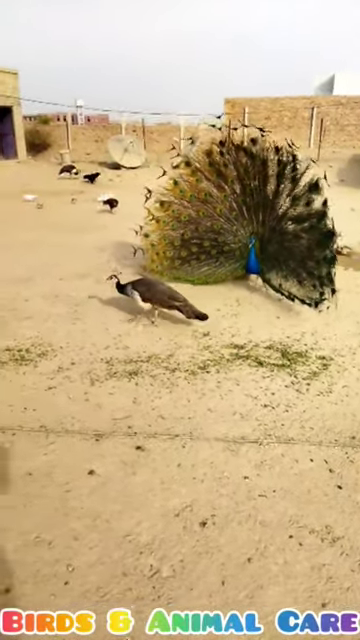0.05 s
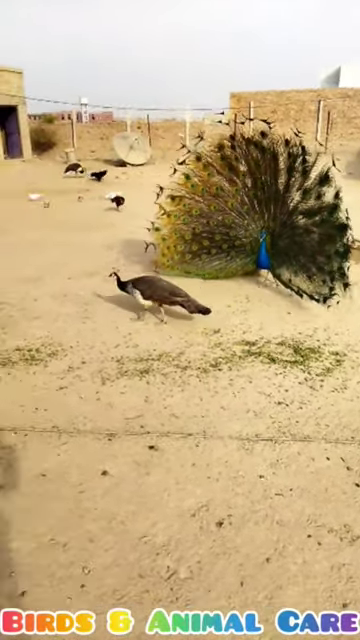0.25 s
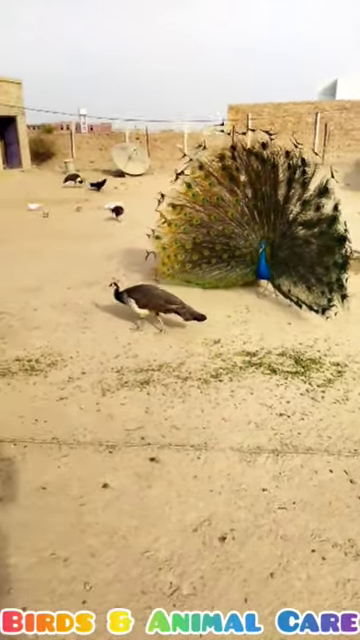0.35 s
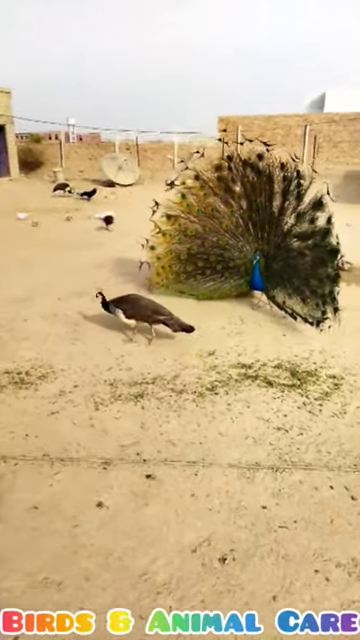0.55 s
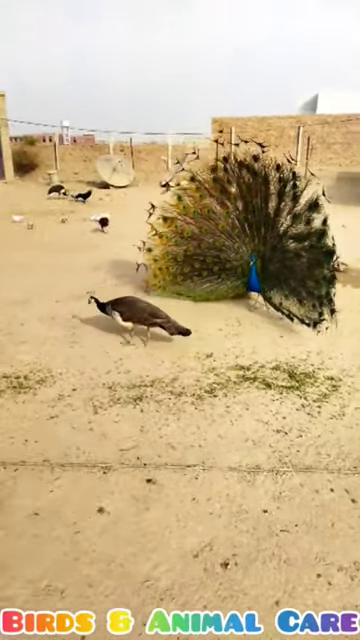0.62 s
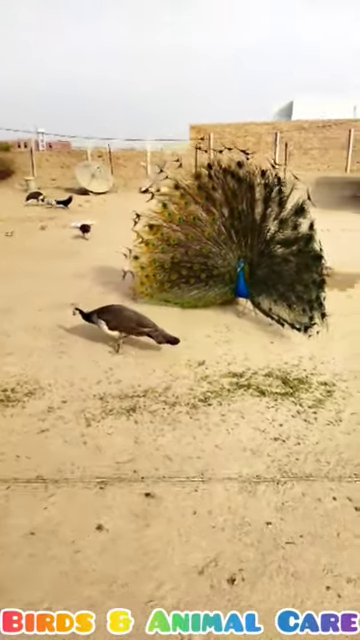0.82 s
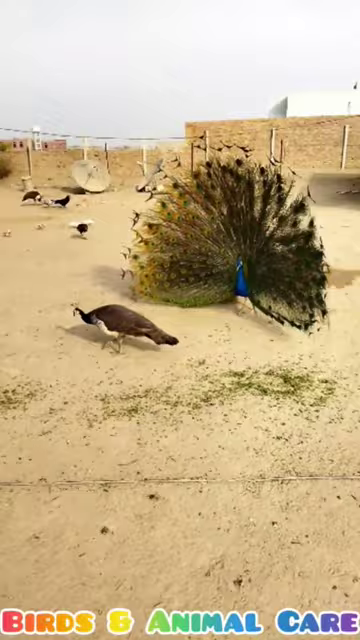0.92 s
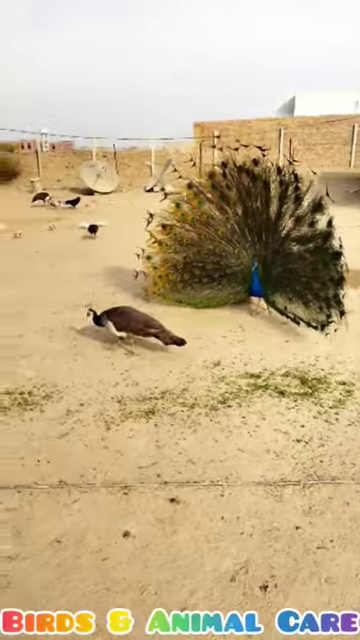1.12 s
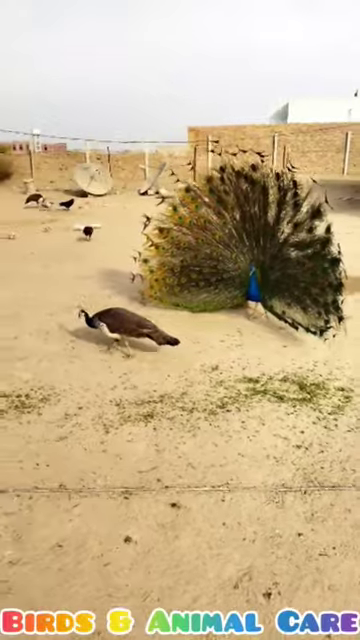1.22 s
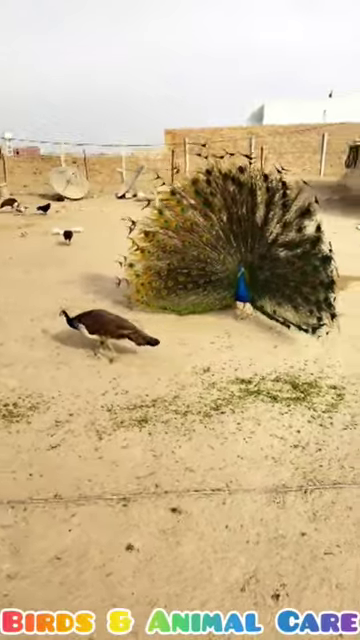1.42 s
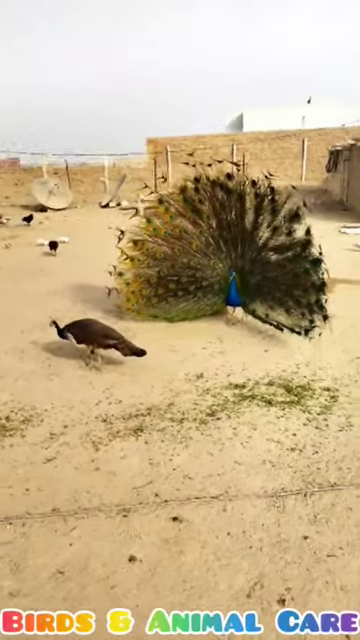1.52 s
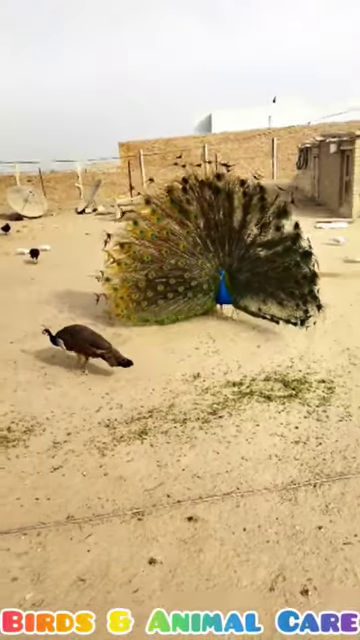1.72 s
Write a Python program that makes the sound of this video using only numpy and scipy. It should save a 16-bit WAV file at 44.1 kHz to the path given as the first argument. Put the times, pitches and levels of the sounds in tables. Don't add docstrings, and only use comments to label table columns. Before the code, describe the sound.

A peafowl gives two loud, harsh nasal calls in a walled yard among small bird chirps

```python
import sys
import numpy as np
from scipy import signal
from scipy.fft import rfft, irfft
from scipy.io import wavfile
from scipy.ndimage import uniform_filter1d

SR = 44100
rng = np.random.default_rng(int(sys.argv[2]) if len(sys.argv) > 2 else 0)


def waveform_to_disk(signal):
    frames = np.transpose(np.atleast_2d(signal))
    scaled = np.clip(frames, -1, 1) * 32767
    samples = np.round(scaled).astype(np.int16)
    wavfile.write(sys.argv[1], SR, samples)


def linear_from_db(decibels):
    return 10 ** (np.asarray(decibels, float) / 20)


N = 77175

# (time [s], pitch [Hz], level [dB], beak-opening tilt [dB/octave], left minus right [dB])
FIRST_CALL = [(0.223, 300, -62, 5, 0), (0.243, 386.7, -38, 8, 0), (.26, 479.3, -35, 3.5, 0),
              (.289, 587, -32, -3, -3), (0.313, 599.4, -31.5, 0.5, -3.5), (0.428, 607, -32.5, -3.5, -4),
              (0.519, 549.2, -32.5, -1, -6.5), (0.587, 511.3, -34.5, 4, 2.5), (0.627, 369.6, -46, 23, -3)]
SECOND_CALL = [(0.948, 301.3, -50.5, -18, -9), (0.976, 382.7, -38, -9, 0), (1.008, 545.5, -33, 3, -3.5),
               (1.054, 619, -31.5, -4.5, 5.5), (1.111, 646, -29, -3.5, 9), (1.192, 630.8, -38, 6.5, 3),
               (1.224, 638, -31.5, 2.5, 1.5), (1.315, 537.2, -34.5, 1.2, -6.5), (1.355, 351.3, -45, -8, -3)]
# (throat shift [ratio], overtone leading the swoop [number], top overtones [dB])
CALL_VOICES = [
    (0.942, 4, -3),
    (0.969, 5, -7.5),
]
# (centre [Hz], width [Hz], level [dB])
THROAT_RESONANCES = [(1123, 640, -9.5), (1982, 554, 5.5), (2538, 572, 0), (3777, 350, -15.5),
                     (4778, 626, -8), (6310, 1150, -17), (8840, 1760, -29.5), (12100, 1000, -34)]
# (frequency [Hz], left lead [rad])
FIRST_TURN = [(1150, 0.01), (1550, -1.1), (1800, 2.05), (2100, -.8), (2400, 1.3), (3000, 2.1), (4500, 1.6)]
SECOND_TURN = [(1280, 4), (1650, 1.3), (1930, 2.43), (2250, 0.94), (2580, 1.04), (3200, 1.73), (4500, 0.87)]
# (arch top [s], peak [Hz], level [dB], tick level [dB], left minus right [dB])
SPARROW_CHIRPS = [
    (0.687, 4420, -37.5, -49.5, 0),
    (1.391, 4483, -39, -53, 0.5),
    (1.603, 4422, -45, -51, -1),
]
# (centre [s], level [dB], pitch [Hz], length [s])
HEN_CLUCKS = [(.74, -58.5, 489.7, 0.02), (.741, -54.5, 250, 0.0095), (0.823, -48.5, 335.5, 0.0095),
              (0.863, -63, 334, 0.019), (0.918, -50.5, 330, 0.022), (1.314, -57, 472.4, 0.019),
              (1.361, -53.5, 677, 0.0072), (1.607, -58, 655, 0.0083), (1.62, -61, 820, 0.029),
              (1.639, -59, 760, 0.0089)]
# (time [s], pitch [Hz], level [dB])
HEN_CROON = [(1.078, 288, -57), (1.103, 262, -67), (1.115, 258.6, -59.5), (1.274, 308, -60),
             (1.295, 290, -58.5), (1.331, 292, -74)]
# (start [s], length [s], from [Hz],
# to [Hz], level [dB])
FAR_WHISTLES = [(.001, .042, 3750, 4006, -57.5), (0.033, 0.028, 4000, 4560, -54.5),
                (.053, 0.03, 4450, 3960, -58), (0.058, 0.045, 4850, 4600, -54),
                (0.093, 0.034, 4700, 3850, -52), (0.058, 0.03, 3400, 2850, -63),
                (0.125, .022, 3150, 3860, -58), (.145, 0.014, 4080, 3800, -49),
                (0.165, 0.022, 3300, 3200, -55), (0.176, 0.055, 3750, 4000, -57),
                (0.225, 0.016, 6050, 6200, -57), (0.737, 0.049, 5150, 5950, -64.5),
                (0.799, 0.051, 5950, 5030, -63), (0.732, 0.04, 7000, 7900, -66),
                (0.744, 0.03, 8350, 8900, -66), (1.008, 0.035, 4000, 3700, -53),
                (.987, .016, 3850, 4000, -53), (.974, .016, 4300, 4450, -55),
                (1.18, 0.015, 4700, 5400, -54), (1.19, 0.031, 3650, 4050, -53),
                (1.216, 0.043, 4050, 3576, -54), (1.245, 0.029, 3550, 3800, -54),
                (1.397, 0.02, 3000, 3300, -64), (0.207, 0.047, 3650, 3300, -63),
                (.01, .11, 2436, 2265, -68.5), (1.712, 0.046, 5100, 6200, -66),
                (.645, .018, 3750, 4000, -54), (1.567, .014, 3600, 4050, -58),
                (1.355, .014, 3750, 3850, -57), (1.51, .025, 5300, 5350, -69)]
# (delay [s], level [dB], left minus right [dB], left lag [ms])
SLAP_ECHOES = [
    (.0031, -15, -4.5, 0.34),
    (.0085, -15, 10, -0.2),
    (.046, -17, -12, 0.073),
    (.072, -17, 8, 0.29),
]
# (delay [s], spread [s], level [dB])
FAR_WALL_SMEARS = [
    (0.091, 0.029, -18),
    (0.259, 0.058, -31.5),
]
# (frequency [Hz], density [dB/Hz])
AIR_COLOUR = [(41, -17), (70, -0.5), (222, -6), (333, -9.5), (1380, -17.5), (2120, -16.5), (3990, -21.5),
              (5730, -27.5), (15500, -36.5)]
# (frequency [Hz], correlation [-1..1])
AIR_LIKENESS = [(60, 0.98), (300, 0.78), (700, 0.7), (1400, 0.047), (3000, -0.1), (8000, -0.071)]
# (time [s], level [dB])
FLOCK_STIR = [(0, 6), (.2, 0.5), (.26, 16), (.7, 8.5), (.84, 3), (.9, -1), (.96, 0.5), (1, 8.5), (1.4, 7.5),
              (1.45, -4), (1.52, -1.5), (1.56, 4.5), (1.66, 0), (1.75, -0.5)]

JITTER_RATIO, SHIMMER_DB, SHIMMER_RISE_DB, BLUR_RAD = .001, 1.2, .45, .018
BREATH_DB, BREATH_TILT_DB_PER_OCT, BREATH_AT_ENDS_DB, ENDS_DULL_DB = -30, 8, 17, 5
SWOOP_FOCUS_DB, SWOOP_S, TOP_FROM_HZ, THROAT_CUT_HZ = 14, .05, 3500, 1000
ARCH_UP_S, ARCH_DOWN_S, ARCH_DROP_RATIO, ARCH_OCTAVE_DB, WARBLE_RATIO = .034, .04, .16, -26, .01003
TICK_LEAD_S, TICK_S, TICK_FROM_RATIO, TICK_TO_RATIO = .069, .0228, .975, 1.07
UPPER_RATIO, UPPER_LAG_S, UPPER_DB = 1.025, .003, -2.5
UPPER_UP_S, UPPER_DOWN_S, UPPER_DROP_RATIO = .024, .032, .055
FLUTTER_DB, WAVER_RATIO, CROON_OCTAVE_DB = 2.5, .01, -5.5
YARD_T60_S, YARD_DB, YARD_CUT_HZ, FAR_WET_DB = .28, -16, 7000, 2
AIR_DB, AIR_PATCHY_DB, STIR_FROM_HZ, MIC_CUT_HZ = -54.5, 1.5, 2760, 71


def in_time(rows):
    time_s, *columns = np.transpose(rows)
    return [np.interp(np.arange(N) / SR, time_s, column) for column in columns]


def at_hz(points, hz):
    point_hz, value = np.array(points)[:, :2].T
    return np.interp(np.log(hz), np.log(point_hz), value)


def smooth(x, width_s):
    return uniform_filter1d(x, int(width_s * SR) + 1)


def drift(rate_hz):
    pole = np.exp(-2 * np.pi * rate_hz / SR)
    white = rng.standard_normal(N + SR // 4)
    slow = signal.lfilter([1], [1, -2 * pole, pole * pole], white)[SR // 4:]
    return (slow - slow.mean()) / slow.std()


def place(x, pan_db, lag_ms, delay_s=0):
    hz = np.fft.rfftfreq(2 * N, 1 / SR)
    lag_s = delay_s + np.array([[lag_ms], [-lag_ms]]) / 2000
    both = irfft(rfft(x, 2 * N) * np.exp(-2j * np.pi * hz * lag_s))[:, :N]
    return both * linear_from_db(np.array([[pan_db], [-pan_db]]) / 2)


def peafowl(rows, shift, lead, top_db):
    hz, db, tilt, _ = in_time(rows)
    t = np.arange(N) / SR
    start_s, end_s = rows[0][0], rows[-1][0]
    swoop = np.clip(2 - 2 * (t - start_s) / SWOOP_S * 0.89, 0, 1)
    ends = 1 - hz / hz.max()
    hz = smooth(hz, 0.0084) * (1 + JITTER_RATIO * (1 + 8 * ends) * drift(71))
    phase = 2 * np.pi * np.cumsum(hz) / SR

    tone, power = 0, 0
    for k in range(1, 20):
        shimmer_db = (SHIMMER_DB + SHIMMER_RISE_DB * np.clip(k - 3, 0, 7)) * drift(23)
        beak_db = tilt * np.clip(np.log2(k * hz / 2000), -.6, .6)
        dull_db = ENDS_DULL_DB * ends * np.maximum(k - 5, 0)
        high_db = top_db * (k * hz > TOP_FROM_HZ)
        focus_db = SWOOP_FOCUS_DB * swoop * (k != lead) * (k != 2)
        gain = throat(k * hz / shift) * linear_from_db(shimmer_db + beak_db - dull_db + high_db - focus_db)
        tone = tone + gain * np.sin(k * phase + k * k * 0.27 + BLUR_RAD * k * drift(81))
        power = power + gain ** 2 / 2
    tone = tone / smooth(np.sqrt(power), 0.065)

    f = np.fft.rfftfreq(N, 1 / SR) + 1
    colour = throat(f / shift) * linear_from_db(BREATH_TILT_DB_PER_OCT * np.log2(f))
    puffs = rng.standard_normal(N) * (1 + np.cos(phase))
    breath = irfft(rfft(puffs) * colour, N)
    breath_db = BREATH_DB + 2 * BREATH_AT_ENDS_DB * np.minimum(ends, .3)
    edge = np.clip(np.minimum(t - start_s, end_s - t) / 0.017, 0, 1)
    return edge * linear_from_db(smooth(db, 0.0051)) * (tone + linear_from_db(breath_db) * breath / breath.std())


def throat(hz):
    power = sum(linear_from_db(2 * db) / (1 + (2 * (hz - f) / w) ** 2) ** 2 for f, w, db in THROAT_RESONANCES)
    return np.sqrt(power / (1 + (THROAT_CUT_HZ / hz) ** 6))


def heard(x, rows, turn):
    half = at_hz(turn, np.fft.rfftfreq(N, 1 / SR) + 1) / 2
    pan_db = smooth(in_time(rows)[3], 0.012)
    return irfft(rfft(x) * np.exp(1j * half * [[1], [-1]]), N) * linear_from_db(pan_db * [[1], [-1]] / 2)


def sparrow():
    out = 0
    for s, hz, db, tick_db, pan_db in SPARROW_CHIRPS:
        lower = arch(s, hz, db, ARCH_UP_S, ARCH_DOWN_S, ARCH_DROP_RATIO)
        upper = arch(s + UPPER_LAG_S, hz * UPPER_RATIO, db + UPPER_DB,
                     UPPER_UP_S, UPPER_DOWN_S, UPPER_DROP_RATIO)
        tick = note(s - TICK_LEAD_S, TICK_S, hz * TICK_FROM_RATIO, hz * TICK_TO_RATIO, tick_db)
        out = out + place(lower + upper + tick, pan_db, -0.058)
    return out


def arch(top_s, hz, db, up_s, down_s, drop):
    t = np.arange(N) / SR - top_s
    u = np.clip(np.where(t < 0, t / up_s, t / down_s), -1, 1)
    bend = 1 - drop * np.sin(np.pi * u / 2) ** 2 + WARBLE_RATIO * drift(209)
    phase = 2 * np.pi * np.cumsum(hz * bend) / SR
    wave = np.sin(phase) + linear_from_db(ARCH_OCTAVE_DB) * np.sin(2 * phase)
    return linear_from_db(db + 2 * drift(100)) * (1 - u ** 2) ** 0.93 * wave


def note(start_s, length_s, from_hz, to_hz, db, octave_db=-30):
    u = np.clip((np.arange(N) / SR - start_s) / length_s, 0, 1)
    glide_hz = from_hz + (to_hz - from_hz) * (1 - np.cos(np.pi * u)) / 2
    phase = 2 * np.pi * np.cumsum(glide_hz * (1 + WAVER_RATIO * drift(117))) / SR
    soft = np.sqrt(np.sin(np.pi * u) + 1e-12) * (u > 0) * (u < 1)
    wave = np.sin(phase) + linear_from_db(octave_db) * np.sin(2 * phase)
    return linear_from_db(db + 4.5 + FLUTTER_DB * drift(120)) * soft * wave


def hen():
    hz, db = in_time(HEN_CROON)
    t = np.arange(N) / SR
    phase = 2 * np.pi * np.cumsum(hz * (1 + 0.027 * drift(20))) / SR
    edge = np.clip(np.minimum(t - HEN_CROON[0][0], HEN_CROON[-1][0] - t) / 0.014, 0, 1)
    octave = linear_from_db(CROON_OCTAVE_DB + 2.6 * drift(18)) * np.sin(2 * phase)
    croon = edge * linear_from_db(db + 5.5) * (np.sin(phase) + octave)
    clucks = sum(note(s - d / 2, d, f * 1.05, f * 0.967, level) for s, level, f, d in HEN_CLUCKS)
    return place(croon + clucks, -0.35, -0.14)


def far_birds():
    return place(sum(note(*row) for row in FAR_WHISTLES), 1.0, -0.061)


def yard(x):
    mono = x.mean(0)
    slaps = sum(linear_from_db(db) * place(mono, pan_db, lag_ms, s) for s, db, pan_db, lag_ms in SLAP_ECHOES)
    t = np.arange(SR // 2) / SR
    onset = np.clip((t - .01) / 0.0093, 0, 1)
    tail = rng.standard_normal((2, len(t))) * linear_from_db(-60 * t / YARD_T60_S) * onset
    tail = linear_from_db(YARD_DB) * tail / np.sqrt((tail ** 2).sum(1, keepdims=True))
    for s, spread_s, db in FAR_WALL_SMEARS:
        shape = np.exp(-((t - s) / spread_s) ** 2)
        tail = tail + linear_from_db(db) * rng.standard_normal((2, len(t))) * shape / np.linalg.norm(shape)
    wet = slaps + signal.fftconvolve(mono[None], tail, axes=1)[:, :N]
    return signal.sosfilt(signal.butter(1, YARD_CUT_HZ, fs=SR, output="sos"), wet)


def air():
    out, edges_hz = 0, 28 * 2 ** np.arange(0, 9.4, .5)
    stir_db = smooth(in_time(FLOCK_STIR)[0], 0.021)
    white = rng.standard_normal((2, 2, N + SR))
    for k, (low, high) in enumerate(zip(edges_hz, edges_hz[1:])):
        band = signal.butter(2, [low, high], "band", fs=SR, output="sos")
        mid, side = signal.sosfilt(band, white[k % 2])[:, SR:]
        hz = np.sqrt(low * high)
        alike = np.clip(at_hz(AIR_LIKENESS, hz), -1, 1)
        band_stir_db = stir_db / (1 + (STIR_FROM_HZ / hz) ** 2)
        gain = linear_from_db(at_hz(AIR_COLOUR, hz) + AIR_PATCHY_DB * drift(36) + band_stir_db)
        out = out + gain * (np.sqrt(1 + alike) * mid + np.sqrt(1 - alike) * side * [[1], [-1]])
    return linear_from_db(AIR_DB) * out / out.std()


def scene():
    first = peafowl(FIRST_CALL, *CALL_VOICES[0])
    second = peafowl(SECOND_CALL, *CALL_VOICES[1])
    calls = heard(first, FIRST_CALL, FIRST_TURN) + heard(second, SECOND_CALL, SECOND_TURN)
    chirps = sparrow()
    far = far_birds()
    to_walls = linear_from_db(0.5) * (first + second) + linear_from_db(-5.5) * chirps + linear_from_db(FAR_WET_DB) * far
    return calls + chirps + far + yard(to_walls) + hen() + air()


def low_pass(x):
    return signal.sosfilt(signal.butter(12, 15640, fs=SR, output="sos"), x)


def record(dry):
    mix = signal.sosfilt(signal.butter(3, MIC_CUT_HZ, "high", fs=SR, output="sos"), dry)
    return low_pass(mix)


dry = scene()
out = record(dry)
waveform_to_disk(out)
```